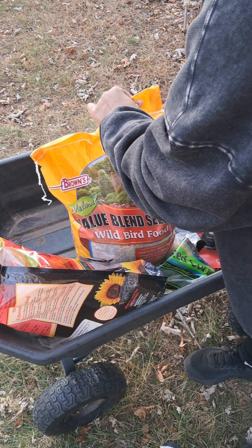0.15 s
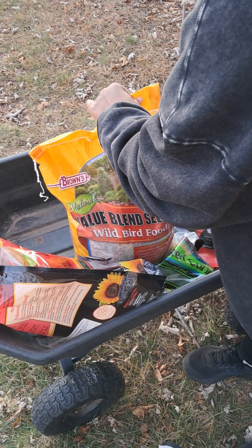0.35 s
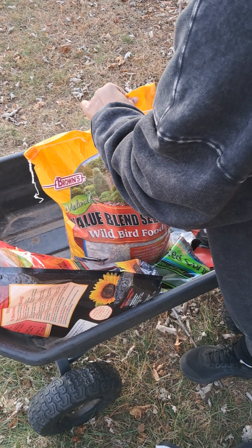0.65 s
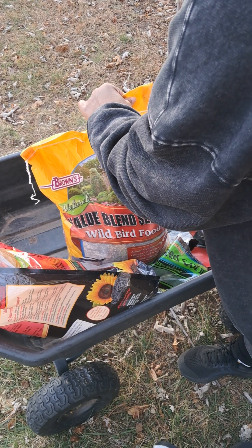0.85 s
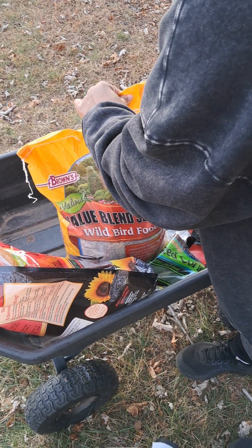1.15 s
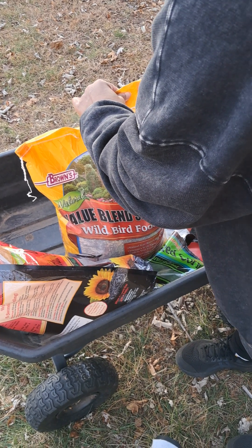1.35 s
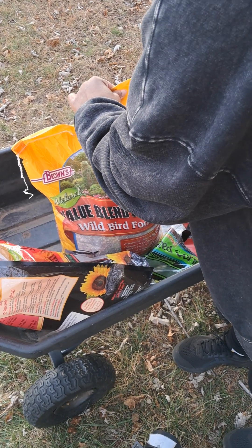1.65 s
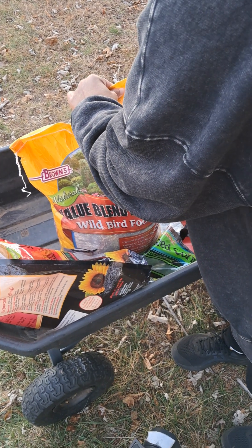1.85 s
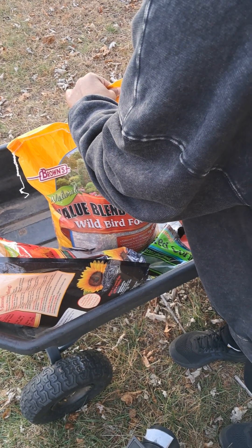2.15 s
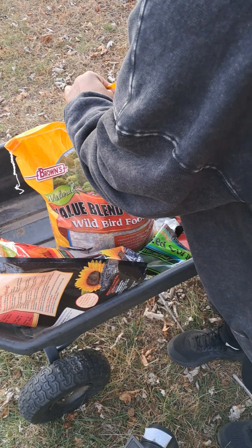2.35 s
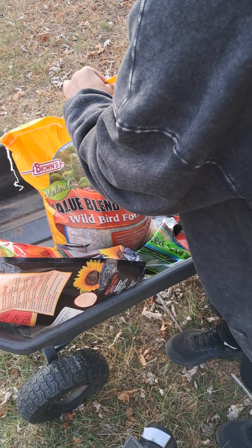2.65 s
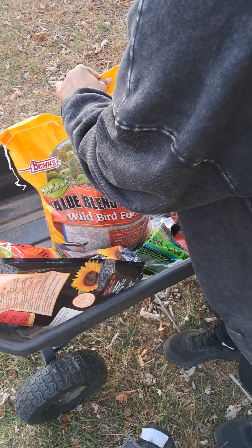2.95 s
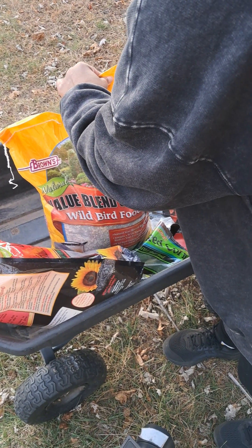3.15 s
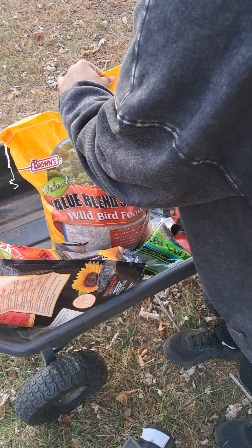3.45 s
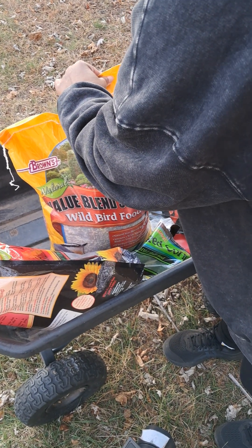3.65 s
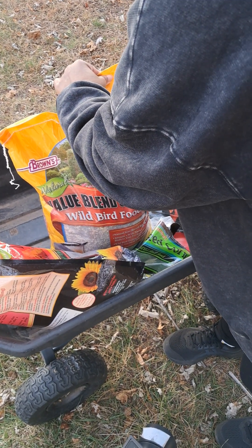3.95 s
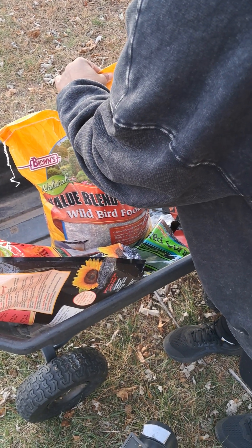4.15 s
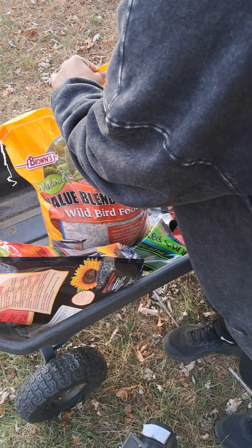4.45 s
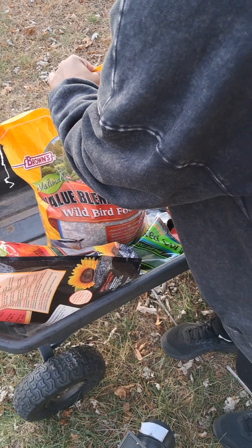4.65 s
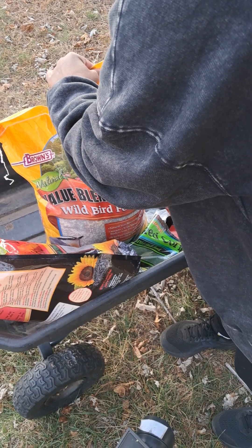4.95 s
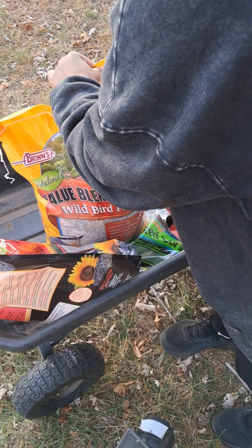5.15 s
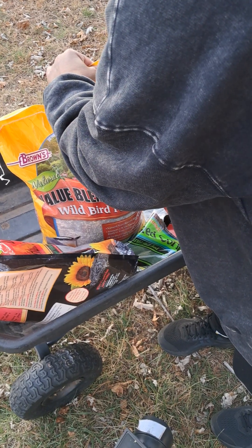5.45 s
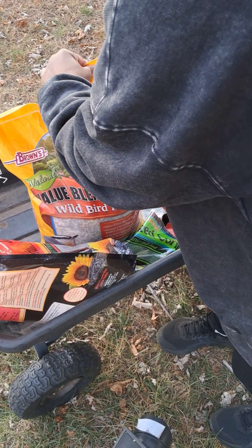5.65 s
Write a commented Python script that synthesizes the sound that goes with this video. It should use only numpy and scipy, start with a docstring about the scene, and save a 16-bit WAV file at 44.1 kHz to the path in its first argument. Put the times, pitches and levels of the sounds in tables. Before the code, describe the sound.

Hands crumple a woven-plastic bag of seed in a garden cart: sharp crinkles, sliding grain, quiet gaps, and faint dull tub knocks.

```python
"""In a garden, outdoors, hands crumple a stiff woven-plastic sack of seed lying in a cart.
The sheet buckles in swarms of tiny creases and in single snaps: noise bursts, clicks and short rings.
The sack's air pocket and the loaded cart tub colour the noise, and seed slides inside.
Now and then the hollow tub is bumped and rings as a set of fading tones.
Faint outdoor air is filtered noise. Two microphones hear it all, the treble stronger on the right."""
import sys
import numpy as np
from scipy import signal
from scipy.fft import rfft, irfft, next_fast_len
from scipy.io import wavfile
from scipy.ndimage import uniform_filter1d, map_coordinates

SR = 44100
rng = np.random.default_rng(int(sys.argv[2]) if len(sys.argv) > 2 else 0)


def wav_record(signal):
    """Record a signal, one row per channel, as 16-bit PCM in the file named by sys.argv[1]."""
    frames = np.transpose(np.atleast_2d(signal))
    bounded = np.clip(frames, -1, 1)
    # unit amplitude maps onto the largest positive 16-bit level
    quanta = np.round(bounded * 32767).astype(np.int16)
    wavfile.write(sys.argv[1], SR, quanta)


def gain_from_db(level_db):
    """Convert decibel levels to linear amplitude factors (20 dB per decade)."""
    decades = np.asarray(level_db, float) / 20
    return 10 ** decades


N = 255339  # samples


def unit(x):
    """Scale to an rms (average strength) of 1."""
    return x / np.sqrt(np.mean(x ** 2) + 1e-20)


def along(points, hz):
    """Read a curve of (f/Hz, value) points on a log frequency axis."""
    f, value = np.transpose(points)
    return np.interp(np.log(hz + 1), np.log(f + 1), value)


def filtered(x, response):
    """Multiply the spectrum of x by a response that depends on frequency."""
    m = next_fast_len(N + SR // 2)
    spectrum = rfft(x, m) * response(np.fft.rfftfreq(m, 1 / SR))
    return irfft(spectrum, m)[..., :N]


def resonances(peaks):
    """Sum of resonances with alternating signs; each favours the band around its centre."""
    def response(f):
        total = 0
        for k, (centre, width, db) in enumerate(peaks):
            peak = 1j * f * width / (centre * centre - f * f + 1j * f * width)
            total = total + (-1) ** k * gain_from_db(db) * peak
        return total
    return response


def coloured(points):
    """Smooth spectrum drawn through (f/Hz, level/dB) points."""
    return lambda f: gain_from_db(along(points, f))


# likeness of left and right: (f/Hz, correlation from 0 to 1)
LIKENESS = [(60, .8), (180, .97), (550, .92), (1200, .85), (2500, .55), (5000, .4), (12000, .3)]
# left against right: (f/Hz, level/dB)
LEFT_OVER_RIGHT = [(60, -8), (99, 2.5), (160, 0.5), (270, -7), (450, -2.5), (740, -1.5), (1220, 6),
                   (2010, -2), (3330, -5), (5500, -11.5), (9080, -11), (15000, -28.5)]


def ports(a, b):
    """Mix two versions of a sound into left and right: alike in the bass, less so in the treble."""
    right_lag_s = 7e-5

    def blend(f):
        angle = np.arccos(np.clip(along(LIKENESS, f), -1, 1)) / 2
        return np.array([np.cos(angle), np.sin(angle)])

    def place(f):
        share = 2 / (1 + gain_from_db(np.outer([-1, 1], along(LEFT_OVER_RIGHT, f))))
        return share * np.exp(-2j * np.pi * np.outer([0, right_lag_s], f))

    mid, side = filtered(np.array([a, b]), blend)
    return filtered(np.array([mid + side, mid - side]), place)


def swarm(per_s, spread_db, t60):
    """Seeds and tiny creases of scattered size: each starts sharply and fades 60 dB in t60 seconds."""
    sizes = gain_from_db(spread_db * np.tanh(rng.standard_normal(N) / 2))
    kicks = (rng.random(N) < per_s / SR) * sizes
    return unit(signal.lfilter([1], [1, -gain_from_db(-60 / (t60 * SR))], kicks))


def patchy(depth_db):
    """Two noises sharing one colour that wanders at random over time and frequency."""
    z = signal.stft(rng.standard_normal((2, N)), nperseg=256)[2]
    field = uniform_filter1d(rng.standard_normal(z.shape[1:]), 5, 0)
    field = uniform_filter1d(field, 5, 1)
    return unit(signal.istft(z * gain_from_db(depth_db * unit(field)), nperseg=256)[1][:, :N])


# squeezes and shifts of the sack, at their peak:
# (t/s, level/dB, swell/s, fade/s, tautness of the sheet/dB); swell and fade are nominal 20 dB times
RUSTLES = [(0.0, -15, .01, 0.031, -12.5), (0.045, -31, 0.042, .03, -9), (0.065, -24, 0.005, 0.023, -18),
           (0.108, -32, .03, 0.065, 2.5), (0.142, -25.5, 0.097, 0.068, -1.5),
           (0.206, -35, .005, 0.027, -10.5), (0.235, -54.5, 0.045, 0.11, -8),
           (0.508, -56.5, .1, 0.047, -12.5), (0.81, -68, .015, 0.089, -4.5), (0.898, -56, 0.15, 0.069, -9),
           (1.064, -56.5, 0.014, 0.087, -2), (1.149, -65.5, 0.023, 0.072, 4),
           (1.246, -72, 0.014, .03, -14.5), (1.3, -63.5, 0.11, 0.24, -9), (1.365, -55, 0.015, 0.078, -14),
           (1.466, -52.5, 0.01, 0.076, -0.5), (1.601, -69, 0.018, 0.32, 7.5),
           (1.689, -48.5, 0.049, 0.84, 4.5), (1.872, -32.5, 0.21, .2, -8.5), (1.93, -30.5, 0.06, 0.01, -2),
           (1.98, -26.5, 0.071, 0.031, -11), (2.082, -26, 0.04, 0.073, -13.5),
           (2.109, -25, 0.0038, 0.02, -0.5), (2.186, -31, .007, 0.06, -14),
           (2.232, -22.5, .04, 0.062, -8.5), (2.28, -29.5, .008, .05, -11), (2.324, -23, 0.034, 0.035, -3),
           (2.402, -23.5, .008, 0.15, -8.5), (2.455, -19, 0.053, 0.044, -0.5),
           (2.58, -17.5, 0.046, 0.055, -10), (2.63, -26, 0.035, 0.11, -6.5), (2.72, -33, 0.067, 0.026, 0),
           (2.791, -39, 0.046, 0.044, -2.5), (2.813, -21, 0.0069, 0.052, -4.5),
           (2.848, -33, .03, 0.074, -5), (2.897, -33, 0.0048, 0.13, -5.5), (2.955, -28, 0.078, .07, -9),
           (3.016, -34.5, 0.026, 0.07, -1), (3.142, -35.5, 0.017, 0.03, -35), (3.29, -47.5, .2, 0.06, -7.5),
           (3.341, -60.5, 0.057, 0.11, -4), (3.41, -48.5, 0.0082, .1, -19),
           (3.448, -34.5, 0.017, 0.076, -0.5), (3.492, -18, 0.0061, 0.0073, -4.5),
           (3.51, -52, .021, 0.12, -6.5), (3.824, -66, 0.053, 0.12, 4), (3.85, -45.5, 0.033, 0.043, -13.5),
           (3.93, -76, .06, 0.17, 2), (4.066, -60, 0.23, .05, 0), (4.084, -28.5, 0.018, 0.041, -5),
           (4.189, -51, 0.027, 0.039, -16.5), (4.23, -71, 0.057, .08, -4), (4.301, -59.5, 0.057, 0.16, -1),
           (4.36, -49, .021, 0.092, -5.5), (4.482, -52, 0.014, 0.055, 1.5), (4.54, -60.5, 0.034, 0.07, -2),
           (4.653, -48.5, 0.013, 0.092, -11.5), (4.754, -50, .011, 0.23, -8.5),
           (4.851, -46, 0.017, 0.21, -10), (4.92, -49.5, 0.041, 0.061, -3.5), (4.98, -45, .05, 0.16, -4.5),
           (5.059, -43, 0.18, 0.094, -10), (5.101, -37, 0.068, 0.046, -27),
           (5.198, -40.5, 0.011, 0.11, -43), (5.304, -46.5, 0.032, 0.13, -5), (5.445, -41, .05, 0.14, 2),
           (5.517, -30, 0.048, 0.12, 1.5), (5.562, -29.5, 0.0065, 0.017, -4.5),
           (5.582, -26.5, 0.034, 0.046, 3.5), (5.629, -34, 0.048, 0.079, -3), (5.72, -48.5, .06, 0.12, -10),
           (5.777, -36.5, .021, .2, -10.5)]
# weight of the shifting sack on the tub: (t/s, level/dB)
WEIGHT = [(0, -40), (.12, -39), (.19, -57.5), (.45, -66.5), (1.2, -65.5), (1.36, -55), (1.8, -69.5),
          (2.1, -50), (2.4, -53), (3.0, -38.5), (3.1, -60), (3.5, -52), (3.65, -77.5), (4.1, -67.5),
          (4.6, -67), (4.76, -52), (5.2, -58.5), (5.35, -44.5), (5.6, -42.5), (5.79, -67)]


def handling():
    """Gains of pocket, tub, sheet and fizz: rustles swell and fade; a taut sheet crackles and fizzes more."""
    let_go = 1.128  # above 1: the fade steepens as hands let go abruptly
    faster = np.array([[1], [1], [1.056], [1.056]])  # the treble moves faster than the body
    t = np.arange(0, N + 32, 32) / SR
    power = np.zeros((4, len(t)))
    for s, db, swell, fade, taut_db in RUSTLES:
        distance = np.maximum((s - t) / swell, (t - s) / fade)
        shape_db = db - 20 * distance ** let_go * faster
        jolt_db = -17.5  # each rustle also jolts the tub
        # fizz follows tautness and grows less than the rustle does in strong ones
        fizz_db = 0.82 * taut_db - 10.5 - 0.06 * (db + 38.5)
        power += gain_from_db(shape_db + np.array([[0], [jolt_db], [taut_db], [fizz_db]])) ** 2
    power[1] += gain_from_db(np.interp(t, *np.transpose(WEIGHT))) ** 2
    return [np.interp(np.arange(N) / SR, t, np.sqrt(p)) for p in power]


# single buckles of the sheet, before the trims below:
# (t/s, level/dB, air pocket relative level/dB, fizz relative level/dB, ring f/Hz)
SNAPS = [(0.0218, -8.5, -7.5, -20, 1470), (0.0624, -15.5, 0, -30, 1260), (0.108, -13.5, 0, -3, 1270),
         (0.2022, -14.5, -0.5, -22, 1350), (0.8106, -45.5, -5, -32, 1570), (0.8785, -48, -14, -24, 1400),
         (1.0655, -40, -5.5, -18, 1430), (1.2418, -49, -15, 9, 7290), (1.3708, -53, 3, -7, 1670),
         (1.463, -48, -3, -30, 2900), (1.5978, -42, -12, -18, 7000), (1.6202, -35, -6, -21, 1470),
         (1.6886, -26.5, -2.5, -34, 2220), (1.7264, -45, -21, -20, 2070), (1.8394, -27, -21, -17, 1430),
         (1.854, -37, -14, -17, 1470), (1.893, -19.5, -24, -8.5, 2720), (1.9175, -11.5, -21, -16, 1280),
         (1.927, -15.5, -30, -9, 1530), (1.9541, -13, -15, -31, 1420), (1.9752, -11, -11, -21, 1450),
         (2.0034, -20, 0.5, -19, 1300), (2.0535, -27, -8, -14, 1360), (2.0755, -17, -9, -3, 1290),
         (2.0896, -15.5, -5, -31, 1530), (2.1063, -13, 1, -11, 1400), (2.161, -31, -17, -24, 2020),
         (2.181, -16.5, -5, -23, 1530), (2.2076, -10.5, -1, -20, 1580), (2.2272, -7, -5, -12, 3800),
         (2.2759, -20, 9, -27, 1520), (2.2972, -12, -7, -18, 1820), (2.3188, -6.5, -4.5, -16, 1320),
         (2.3948, -18, -14, -21, 1720), (2.4083, -6.5, -14, -13, 1610), (2.4342, -12, 1.5, -20, 1390),
         (2.4499, -13, 4.5, 1, 1440), (2.4612, -13, 2.5, -4, 1300), (2.4824, -11, -2, -13, 1950),
         (2.4984, -14.5, -13, -7.5, 1460), (2.5516, -37, -5, -30, 1300), (2.551, -23, 2, -36, 1530),
         (2.5733, -4, -7, -17.5, 1370), (2.6179, -9, -6, -9, 1450), (2.6467, -9, -6.5, -6, 1290),
         (2.6785, -8.5, -11, -12, 1440), (2.6978, -12, -19, -10, 1310), (2.7148, -6.5, -14, -7, 1520),
         (2.7526, -29, -23, -16, 2130), (2.7766, -29, -16, -22, 2210), (2.788, -21, -7, -16, 2170),
         (2.8098, -8.5, -13, -20, 2080), (2.849, -13.5, -2, -21, 1270), (2.8924, -9.5, -7, -21, 3120),
         (2.9242, -21.5, 7, -26, 1290), (2.9482, -17.5, 3.5, -8.5, 1300), (3.0105, -40, -7, -18, 1490),
         (3.1373, -41, 13, -32, 1530), (3.2509, -41.5, 6, -17, 1520), (3.314, -46, -7, -1, 1300),
         (3.405, -52.5, 16.5, -33, 1310), (3.4234, -45, -11, -20, 1300), (3.4461, -21, -3.5, -4.5, 2930),
         (3.4899, -19, -0.5, -8, 1850), (3.827, -39.5, -1.5, -10, 7250), (3.8465, -38.5, -3.5, -38, 1350),
         (3.9463, -30.5, -29, -33, 3720), (3.995, -38.5, -11, -21, 7500), (4.0108, -38.5, -5, -20, 6000),
         (4.0574, -35.5, -3, -30, 2060), (4.076, -25, -14, -18, 1360), (4.119, -40, 12.5, -17, 1360),
         (4.1884, -54.5, 12, -30, 1520), (4.3177, -52, -8, 2, 5360), (4.3611, -25, -12.5, -14.5, 1280),
         (4.4835, -37, -2, -13.5, 1360), (4.5222, -41, -21, -14, 4080), (4.654, -44.5, -9, -29, 1400),
         (4.7566, -44, 4, -30, 1320), (4.8499, -36.5, 5, -31, 1430), (4.8903, -33, -16, -17, 1600),
         (4.9076, -28, -5.5, -16, 1320), (4.918, -37, 3, -33, 1470), (4.9569, -27, -2.5, -33, 1390),
         (4.9896, -30.5, 3.5, -29, 1310), (5.0544, -22, -6, -40, 1990), (5.0622, -24, -4, -37, 1300),
         (5.1954, -55, 8.5, -40, 1520), (5.2969, -40, -5, -31, 1460), (5.3515, -34, -14, -24, 3120),
         (5.4146, -31, -9, -23, 5100), (5.4375, -27, -27, -16, 4840), (5.4504, -29, -3, -23, 1470),
         (5.5084, -19.5, 0.5, -18, 1880), (5.5588, -18, -2, -2, 2000), (5.5739, -16.5, -8.5, -1.5, 2170),
         (5.624, -21, -16, -1.5, 1320), (5.6325, -15, -18, -12, 1360), (5.7574, -40, 5, -15, 1310),
         (5.7693, -30.5, -7, -4, 1300)]
# fade lengths of pocket, sheet and fizz: (multiple of the basic fade); the treble dies sooner
SNAP_SPANS = np.array([[1.3], [.9], [.7]])


def snaps():
    """Single buckles: a click, a fade for the noise, and the brief ring of the panel that popped."""
    fades, clicks, rings = np.zeros((3, N + SR)), np.zeros((3, N + SR)), np.zeros(N + SR)
    t = np.arange(SR // 5) / SR
    polarities = np.where(rng.random(len(SNAPS)) < .5, -1, 1)  # each click's polarity is chosen by chance
    for (s, db, pocket_db, fizz_db, hz), polarity in zip(SNAPS, polarities):
        at = round(s * SR)
        size = gain_from_db([db + pocket_db - 6.5, db - 12, db + fizz_db - 4])
        # basic time to fade 60 dB, slightly shorter for stronger buckles
        t60 = max(0.028 * (1.5 - 0.0019 * (db + 28)), .003)
        rise = 1 - np.exp(-t / 0.00045)
        fades[:, at:at + len(t)] += size[:, None] * gain_from_db(-60 * t / (t60 * SNAP_SPANS)) * rise
        clicks[:, at + 8] += size * [9, 6.5, 4.5] * polarity
        rings[at:at + len(t)] += gain_from_db(db - 9.5 - 60 * t / 0.029) * np.sin(2 * np.pi * hz * t)
    return fades[:, :N], clicks[:, :N], rings[:N]


# air pocket of the sack: (f/Hz, width/Hz, level/dB)
POCKET = [(511.6, 73, -3.5), (624.7, 55, -2), (843.6, 88.5, 5), (1180, 643, -6), (1520, 310, -4)]
# drumming of the loaded tub: (f/Hz, level/dB per Hz)
LOADED = [(45, -29.5), (65, -17.5), (102, -10.5), (150, -23.5), (215, -3.5), (260, -7), (305, -0.5),
          (400, -16), (700, -55)]
# crackling sheet: (f/Hz, level/dB per Hz)
SHEET = [(760, -30), (1300, -12.5), (1570, -16.5), (1680, -5), (2510, -5), (3100, -6.5), (4290, -12.5),
         (5460, -8.5), (6840, -9.5), (8300, -30), (10800, -58.5), (18300, -120)]
# fizz at the top of the sheet's sound: (f/Hz, level/dB per Hz)
FIZZ = [(4880, -44.5), (8300, -8.5), (10300, -6.5), (12100, 5.5), (13100, -1), (15500, -2), (16300, -30),
        (16500, -25)]


def sack():
    """Sliding seed, creases and snaps shape noise, which pocket, tub, sheet and fizz then colour."""
    creases = swarm(per_s=270, spread_db=13, t60=0.0029)
    folds = swarm(per_s=170, spread_db=1.0, t60=0.039)
    rattle = unit(1.4 + folds + 2.04 * creases)
    crackle = unit(1.26 + creases)
    (puff, snap, spit), (pop, tick, spark), rings = snaps()
    out = rings * np.array([[1], [.4]])
    layers = ((rattle, puff, pop, resonances(POCKET)),
              (rattle, 0.73 * puff, 0.18 * pop, coloured(LOADED)),
              (crackle, snap, tick, coloured(SHEET)),
              (crackle, spit, spark, coloured(FIZZ)))
    for gain, (grain, fade, click, voice) in zip(handling(), layers):
        noise = patchy(depth_db=2.5)
        push = np.hypot(gain * grain, fade) * noise + click * np.array([[1], [.6]])
        # divide by the voice's own loudness so that the gains set the level
        out = out + filtered(push, voice) / np.std(filtered(noise[0], voice))
    return ports(*out)


# colour of the outdoor air: (f/Hz, level/dB per Hz)
AIR = [(20, -53.5), (34, -19.5), (70, -5), (180, -17), (245, -24.5), (312, -23), (460, -27), (850, -22.5),
       (1100, -28), (1500, -30.5), (2100, -35), (2700, -42), (4300, -45), (6600, -45), (8300, -58.5),
       (11500, -51), (16000, -52.5)]


def air():
    """Distant outdoor rumble and hiss: coloured noise whose level drifts slightly."""
    drift = map_coordinates(rng.standard_normal(40), [np.arange(N) * 6.3 / SR])
    far = filtered(rng.standard_normal((2, N)), coloured(AIR))
    return gain_from_db(-60 + 0.57 * drift) * unit(ports(*far))


# bumps and rebounds on the cart tub, before the trim below: (t/s, level/dB)
BUMPS = [(0.807, -41.5), (1.247, -31), (3.135, -18.5), (3.149, -23), (3.254, -19.5), (3.268, -25),
         (3.331, -27), (3.353, -32.5), (3.931, -43), (4.647, -23.5), (4.716, -28), (5.198, -16),
         (5.217, -32), (5.241, -20), (5.306, -17), (5.376, -23.5)]
# ringing tones of the cart tub, before chance shifts: (f/Hz, level/dB, time to fade 60 dB/s)
TUB = [(217, -53, 0.13), (219, 2, 0.25), (251, 8, .13), (314.7, -1, 0.22), (382, -2, 0.017),
       (473, -11, 0.18), (645, 5.5, 0.026), (768, -6.5, 0.051), (790, -32, 0.014), (960, -38.5, 0.017),
       (1530, -35, 0.021)]


def tub():
    """A soft bump starts the tub's tones nearly together, at chance strengths and slightly shifted pitches."""
    out, t = np.zeros(N + SR), np.arange(SR // 3) / SR
    scatter = rng.standard_normal((len(BUMPS), len(TUB), 2))
    soft_start = 1 - np.exp(-(t / 0.0027) ** 2)
    for (s, db), draws in zip(BUMPS, scatter):
        ring = 0
        for (hz, level, t60), (strength, shift) in zip(TUB, draws):
            phase = 2 * np.pi * hz * (1 + shift / 40) * (t - .004) + shift / 4
            ring = ring + gain_from_db(level + 2 * strength - 60 * t / t60) * np.sin(phase)
        out[round(s * SR):][:len(t)] += gain_from_db(db - 14.0) * ring * soft_start
    return out[:N] * gain_from_db([[-2.5], [1.5]])  # left, right


def scene():
    """Sack, cart tub and air together."""
    return sack() + tub() + air()


def low_pass(x):
    """Removes everything above the highest recorded frequency."""
    return signal.sosfilt(signal.butter(12, 16790, fs=SR, output="sos"), x)


# colour of the microphone port, with a narrow dip: (f/Hz, level/dB)
PORT = [(6800, -1.5), (7650, 4), (8050, -7), (8700, -5), (9300, -2.5), (10800, -1.5)]


def record(dry):
    """The microphone port colours the sound, and the loudest peaks are gently rounded off."""
    heard = filtered(dry, coloured(PORT))
    heard = heard / (1 + np.abs(heard) ** 4) ** (1 / 4)
    return low_pass(heard)


dry = scene()
out = record(dry)
wav_record(out)
```